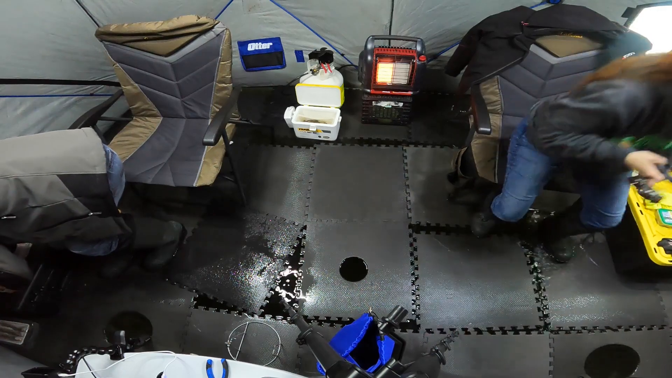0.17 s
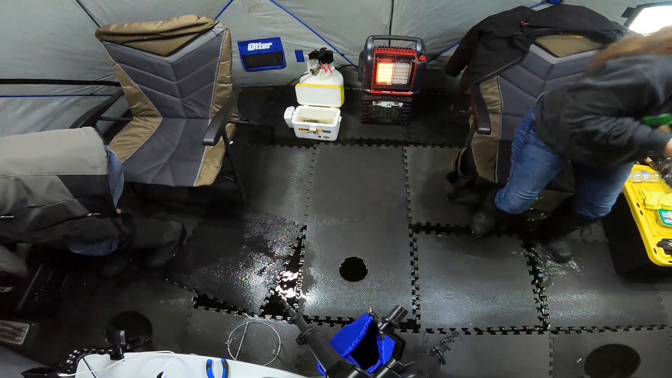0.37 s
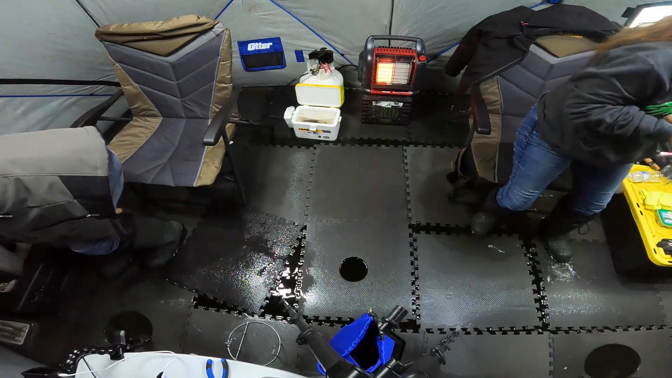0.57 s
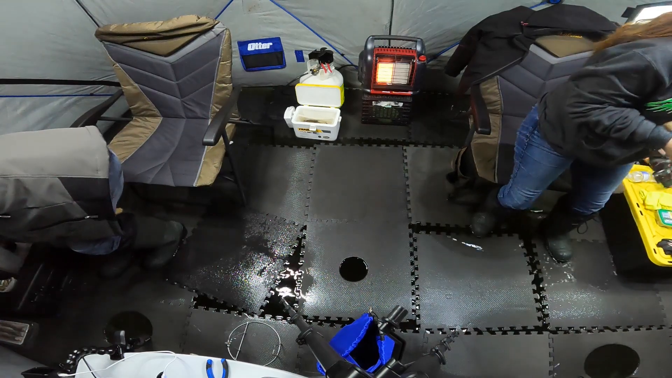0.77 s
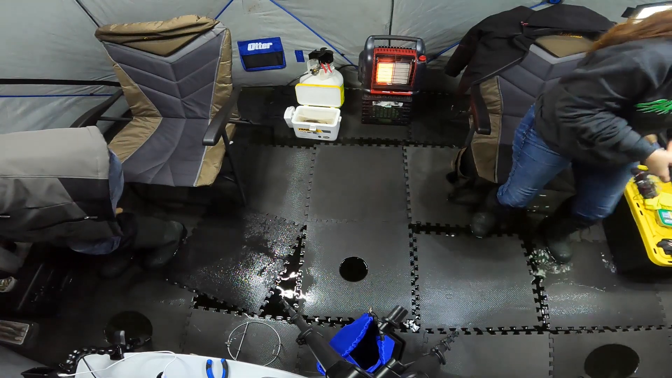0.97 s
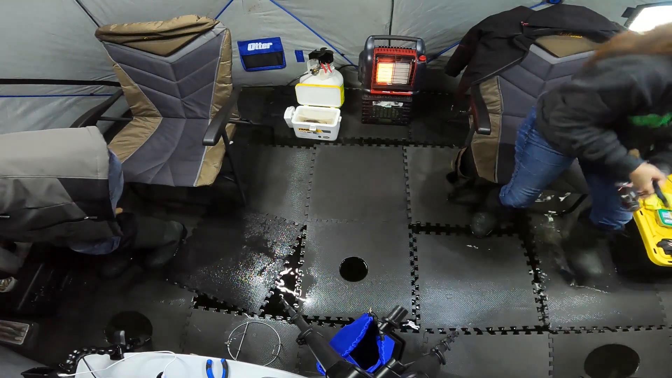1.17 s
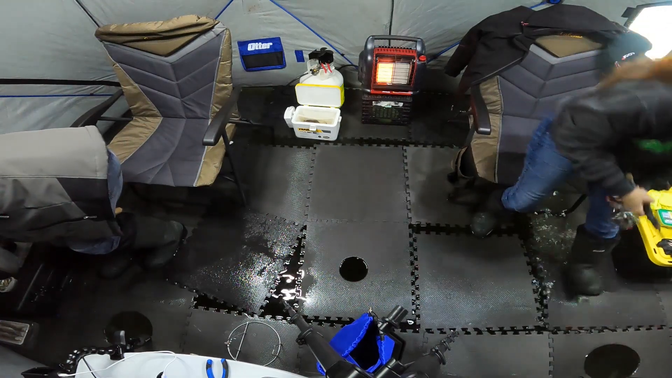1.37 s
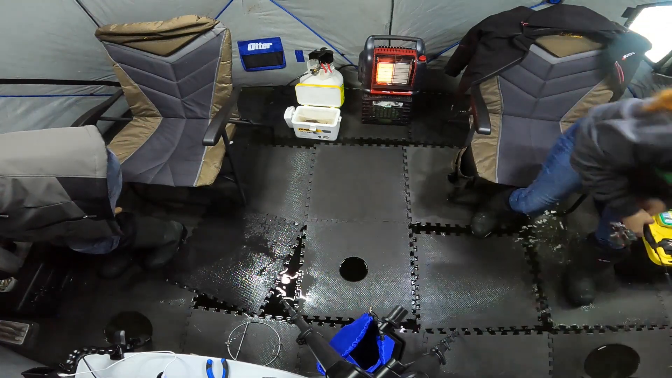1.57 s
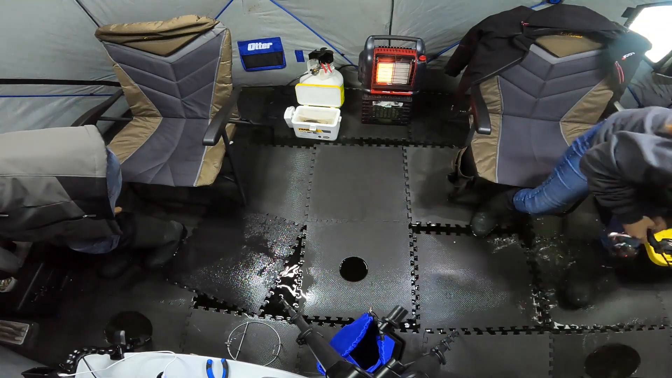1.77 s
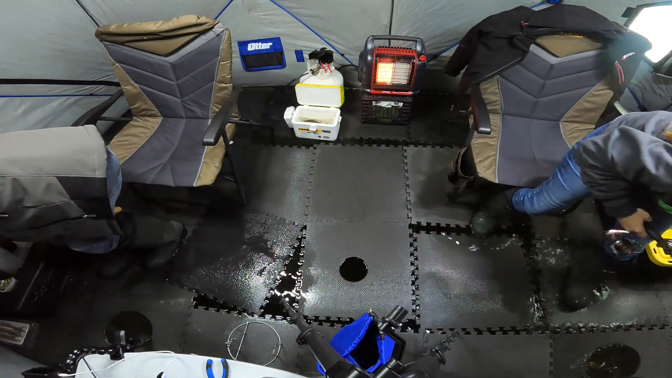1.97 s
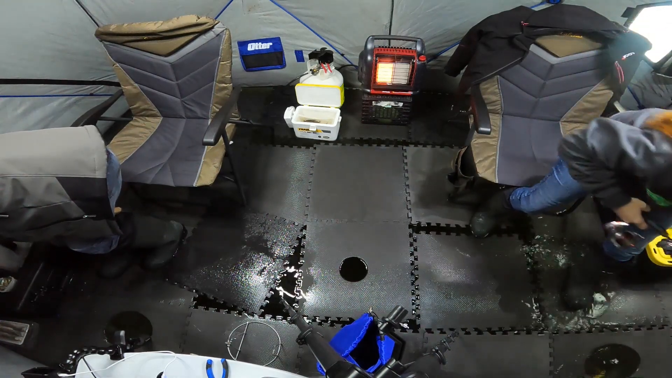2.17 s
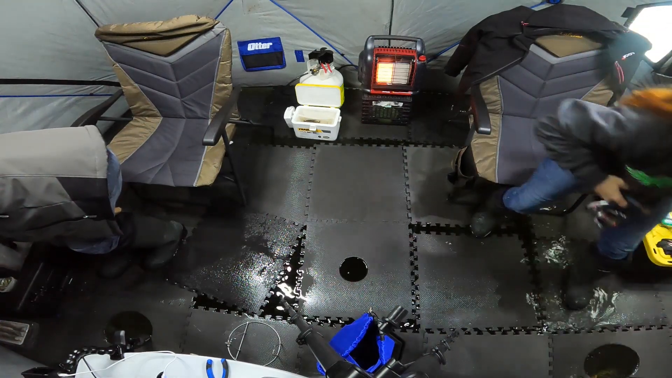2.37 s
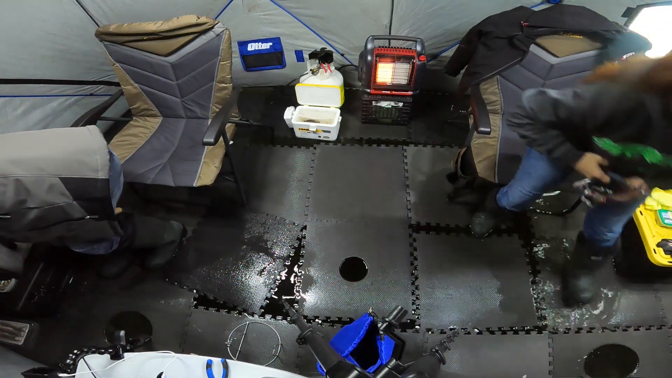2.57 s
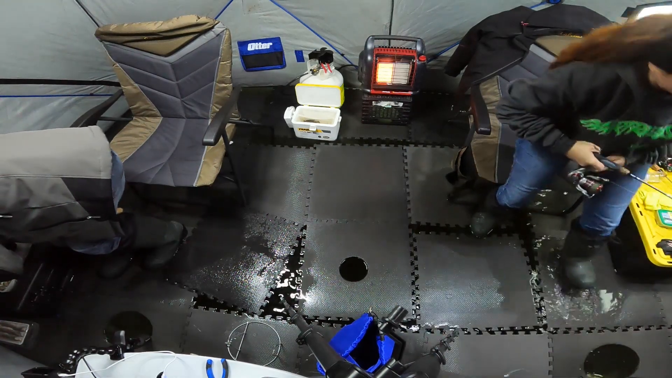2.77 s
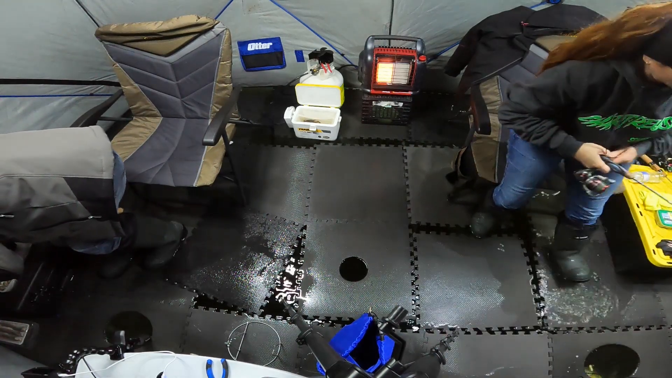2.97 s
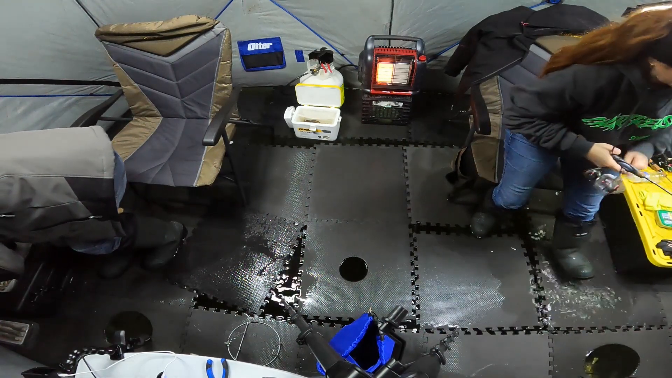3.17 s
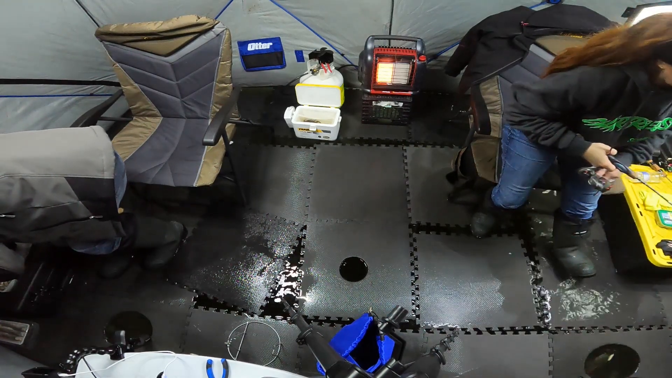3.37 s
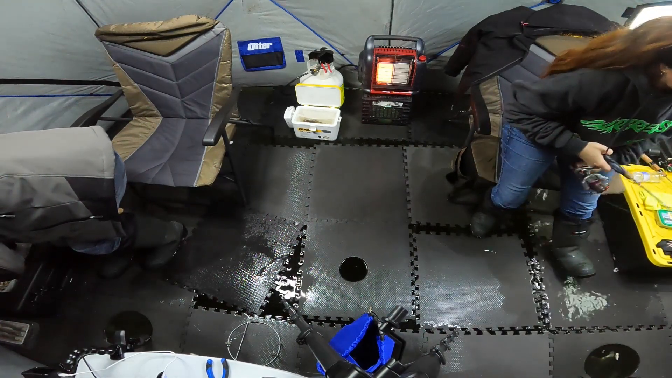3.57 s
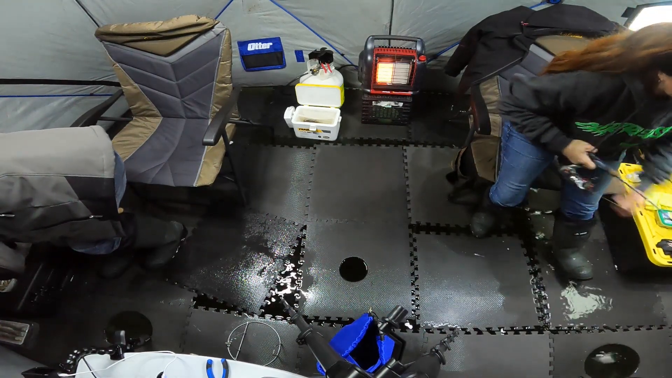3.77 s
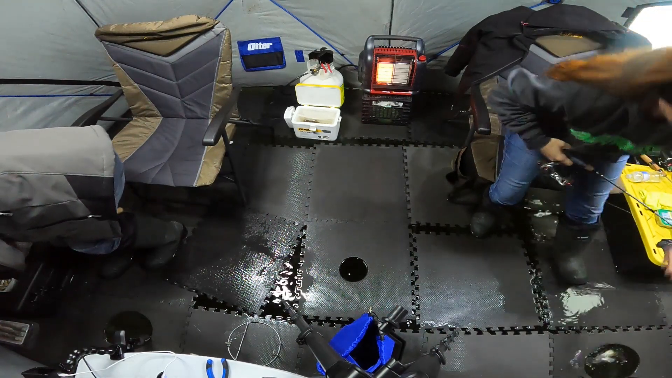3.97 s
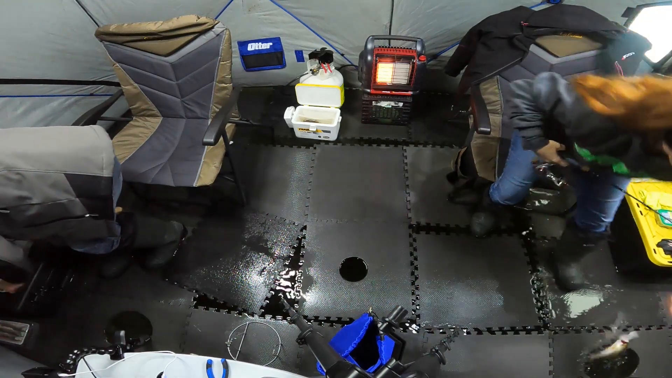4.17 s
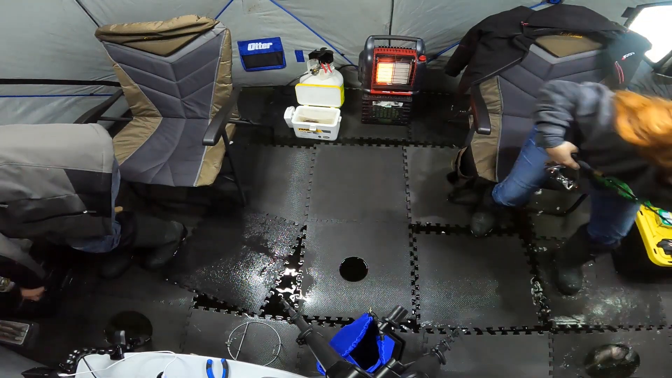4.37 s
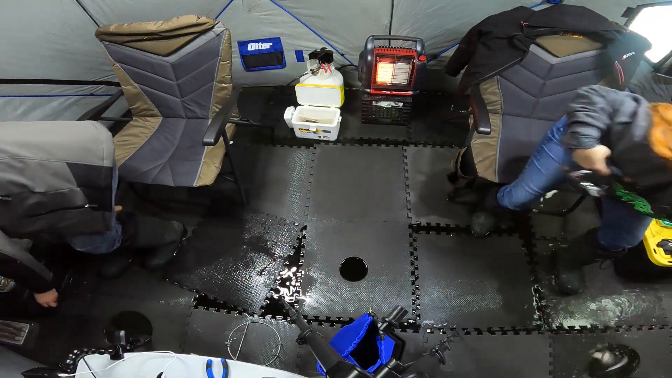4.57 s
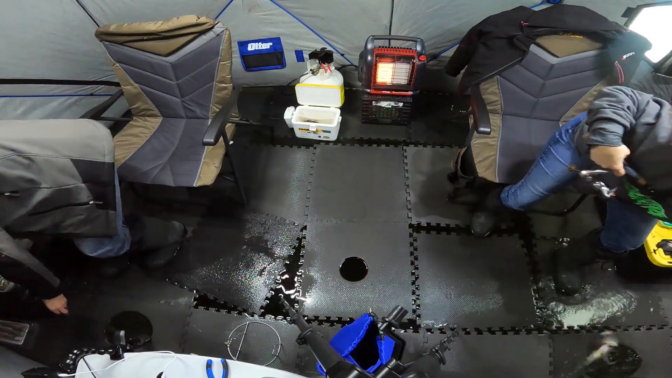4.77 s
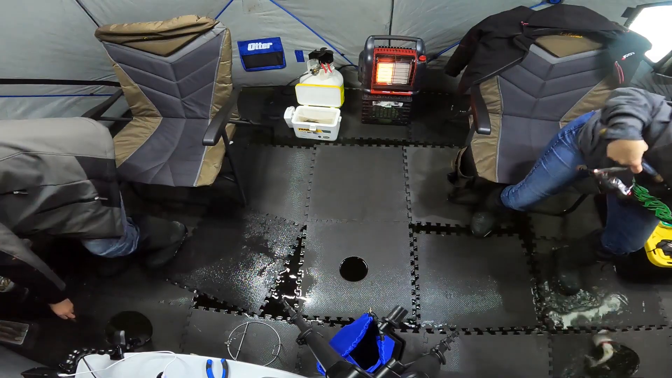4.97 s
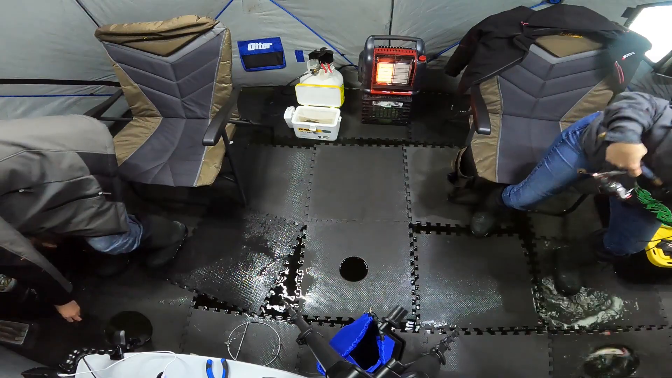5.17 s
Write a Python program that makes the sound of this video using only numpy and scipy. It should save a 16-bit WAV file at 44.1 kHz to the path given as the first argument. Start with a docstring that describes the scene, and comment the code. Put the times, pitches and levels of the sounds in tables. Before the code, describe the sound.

A close, wide stereo scene in a small fabric tent with short, soft reflections. A faint heater hiss, wavering low hum and jacket rustle lie beneath everything, with a deep flutter fading over the first second. Small wet glugs and ticks open, a boot press comes at 0.2 s, and line whirs thinly through a reel from 0.3 to 1.7 s. A plastic lid snaps in a quick triple click at 0.73 s. From 1.2 to 2.2 s boots squelch on flooded mats, with fizz, ringing bubbles and sharp pops strongest around 1.3-2.0 s. Quieter drips follow, then a hollow, wet heel knock at 2.8 s. Two short reel pulls come at 3.3 and 3.6 s in near calm. From 3.9 s a fish thrashes: rapid surges and slaps at 4.3, 4.6 and 4.9-5.1 s, bright spray, plopping bubbles and churning water, loudest near the end.

```python
"""Boots squelch on flooded foam mats inside an ice-fishing tent: bursts of drops and small ringing bubbles.
Tackle ticks, line swishes through a resonant reel, a plastic lid snaps and a heel rings the wet floor.
Then a fish thrashes in an ice hole, its surges and slaps driving spray, bubbles and churned water.
Beneath lie filtered noise for a heater's faint hiss, a rustling jacket and a low, beating hum."""
import sys
import numpy as np
from scipy import signal
from scipy.fft import rfft, irfft
from scipy.io import wavfile

SR = 44100
rng = np.random.default_rng(int(sys.argv[2]) if len(sys.argv) > 2 else 0)


def put_to_file(sound):
    """Save the sound as 16-bit audio at rate SR, in the file named by the first command-line argument."""
    columns = np.atleast_2d(sound).T  # one column per channel
    safe = np.clip(columns, -1, 1)
    whole_steps = np.round(safe * 32767)
    wavfile.write(sys.argv[1], SR, whole_steps.astype(np.int16))


N = 229937
T = np.arange(N) / SR

# All levels are relative: layer gains, tent echoes and the stereo mix come on top.
# rustle of the jacket as the angler rises, bends and grows still: (time [s], level [dB])
RUSTLE_LEVEL = [(0, -42.5), (.17, -49), (.3, -49.5), (1.08, -49.5), (1.3, -42.5), (2.2, -49), (2.52, -53.5),
                (2.95, -48), (3.13, -53.5), (3.23, -50), (3.28, -53), (3.38, -43), (3.52, -55), (3.85, -60)]
# lines of the low hum: (frequency [Hz], mean level [dB])
HUM_LINES = [(21, -57), (39.5, -56.5), (61, -67.5)]
# pulls of fishing line through the reel: (time [s], length [s], level [dB])
LINE_PULLS = [(0.308, 0.42, -48), (0.422, 0.21, -43), (0.688, 0.37, -41.5), (1.073, 0.65, -44.5),
              (3.264, 0.17, -43), (3.601, .215, -44)]
# what the running line rings in reel and rod: (frequency [Hz], width [Hz], gain [dB])
REEL_MODES = [(1754, 15, 5.5), (1994, 30, 4), (2286, 63, 6), (2970, 270, -0.5), (4700, 260, 5.5),
              (5080, 130, 3), (5580, 590, 1.5), (6870, 330, 9), (8000, 320, -7)]
# ticks and pops of tackle, wet boots and falling drops: (time [s], level [dB], centre [Hz])
TICKS = [(0.1642, -23.5, 7600), (0.2457, -28.5, 2680), (1.305, -17.5, 7470), (1.3526, -16.5, 6240),
         (1.4132, -18, 4030), (1.5785, -22, 2520), (1.7115, -16.5, 4250), (1.7558, -16, 2500),
         (1.874, -26, 2280), (1.882, -25, 3100), (1.9015, -16, 2320), (1.9695, -22, 1800),
         (2.036, -23.5, 4600), (2.113, -27, 3480), (2.173, -27.5, 3720), (2.197, -30, 1600),
         (2.213, -24.5, 7560), (2.254, -39.5, 1360), (2.348, -40.5, 960), (2.371, -37, 1600),
         (2.407, -33, 5200), (2.428, -28, 6200), (2.541, -43, 1740), (2.576, -36, 2140), (2.67, -27, 7200),
         (2.7272, -21, 2820), (2.758, -26, 4760), (2.774, -41, 840), (2.839, -35, 4480), (2.872, -27, 2080),
         (2.909, -30, 7400), (3.0266, -30, 6110), (3.167, -35, 2260), (3.1877, -23.5, 6860),
         (4.152, -26, 3370), (4.243, -20.5, 5300), (4.442, -22, 2310), (4.628, -25.5, 2040),
         (4.894, -15, 7590), (4.944, -21.5, 2170), (5.129, -21, 4730)]
# the box lid snaps shut and chatters: (time [s], level [dB], chatter relative to snap [dB])
LID_SNAPS = [(0.7296, -19, -38), (0.7365, -20, -19), (0.7426, -26, -9)]
# the heel lands and settles: (time [s], level [dB])
HEEL_KNOCKS = [(2.8062, -15), (2.8175, -29)]
# what the heel rings in the wet floor: (frequency [Hz], gain [dB], t60 [s])
FLOOR_MODES = [(113, -4.5, 0.24), (244, -5.5, 0.14), (375, -5, 0.094), (740, -1, 0.22), (810, 10.5, 0.036),
               (930, 12.5, 0.02), (2490, 10, 0.0059)]
# glugs of water pockets under the soles: (time [s], level [dB], start pitch [Hz], end pitch [Hz])
GLUGS = [(0, -37, 1120, 1720), (.086, -46, 317, 228), (.207, -44.5, 443, 336), (1.17, -35.5, 683, 290),
         (1.197, -41, 1260, 2030), (1.281, -40, 490, 1510), (1.348, -36.5, 1093, 2080)]
# largest bubbles, under boots and in the hole: (time [s], level [dB], starting pitch [Hz], t60 [s])
BIG_BUBBLES = [(0.235, -38.5, 400, 0.028), (1.358, -27.5, 1850, 0.027), (1.373, -31, 1800, 0.037),
               (1.39, -40.5, 1350, 0.051), (1.47, -29.5, 2160, 0.017), (1.592, -27, 1475, 0.015),
               (1.605, -30, 1420, 0.024), (1.617, -34, 754, 0.024), (1.666, -33, 467, 0.052),
               (1.761, -30, 2670, 0.03), (1.881, -23.5, 1120, 0.0067), (1.954, -23.5, 1910, .02),
               (1.988, -29, 705, 0.047), (2.027, -29, 491, 0.035), (2.09, -33, 455, 0.059),
               (2.121, -29.5, 2640, 0.019), (2.174, -32, 3610, 0.047), (2.908, -32.5, 830, 0.024),
               (3.005, -34.5, 1590, 0.015), (3.008, -30, 2270, 0.011), (3.942, -30.5, 820, 0.011),
               (4.01, -26, 8700, 0.033), (4.019, -38.5, 457, 0.047), (4.155, -29.5, 3170, 0.039),
               (4.167, -32.5, 990, 0.015), (4.482, -32, 714, 0.17), (4.559, -30, 2630, .04),
               (4.565, -33.5, 1117, 0.054), (4.658, -28, 694, 0.0099), (4.729, -30.5, 860, 0.019),
               (4.735, -28.5, 1810, 0.035), (4.778, -32, 725, 0.0076), (4.785, -32.5, 420, 0.028),
               (4.97, -29, 1232, 0.053), (4.987, -17.5, 1980, 0.015), (5.086, -36, 866, 0.026)]
# each press of a boot on the flooded mats:
# (time [s], hold [s], wet fizz [dB], squelch [dB], rumble [dB])
BOOT_PRESSES = [(0, 0.1, -62, -48.5, -70), (.208, 0.027, -86, -52.5, -53), (1.17, 0.045, -55, -43, -51),
                (1.3, 0.18, -51, -76, -89), (1.485, 0.11, -55, -62, -49.5),
                (1.585, 0.12, -50.5, -43.5, -48.5), (1.708, 0.056, -46.5, -36, -47),
                (1.873, 0.042, -53, -42, -66), (1.903, 0.036, -45.5, -45, -51.5),
                (1.975, 0.09, -56, -47, -52), (2.08, 0.092, -63, -50.5, -79),
                (2.192, 0.011, -51, -45, -51.5), (2.37, 0.051, -60.5, -53, -77),
                (2.665, 0.19, -69.5, -52.5, -63.5), (2.803, 0.01, -53.5, -35, -42),
                (2.865, 0.12, -58, -51, -80), (2.982, 0.052, -60.5, -47, -68),
                (3.06, 0.13, -94, -69, -56.5)]
# surges thrown up by beats of the fish's body:
# (time [s], hold [s], fine mist [dB], splatter [dB], churned water [dB])
FISH_SURGES = [(3.895, .05, -47.5, -53, -55), (3.941, 0.063, -39.5, -46.5, -42),
               (4.045, 0.013, -42, -51, -46), (4.1, 0.061, -42, -50.5, -63),
               (4.148, 0.027, -43.5, -44, -46), (4.203, .2, -34, -42.5, -48),
               (4.295, 0.041, -51, -41.5, -42), (4.395, .13, -33, -40, -48.5),
               (4.47, 0.052, -54, -53, -40.5), (4.585, 0.054, -32.5, -39, -41),
               (4.624, 0.089, -28, -38, -41), (4.742, 0.012, -44, -38, -41.5),
               (4.81, 0.09, -36, -44.5, -48), (4.879, 0.091, -26, -42, -41),
               (4.943, 0.053, -27, -38.5, -43.5), (5.015, 0.084, -38.5, -40.5, -44),
               (5.128, 0.014, -28, -36.5, -43)]
# tail slaps on the water: (time [s], fine mist [dB], splatter [dB], t60 [s])
TAIL_SLAPS = [(3.945, -51, -45, 0.11), (4.04, -38, -35.5, 0.055), (4.3, -26, -35.5, 0.076),
              (4.6278, -19.5, -30, 0.033), (4.881, -32, -37, 0.067), (4.944, -23, -37, 0.066),
              (4.972, -25, -56, 0.05), (5.0177, -30, -33, 0.12), (5.125, -26.5, -51, .14)]
# Spectral outlines, each: (frequency [Hz], gain [dB])
# the heater's hiss
HEATER_SPECTRUM = [(25, -12), (60, -8), (110, 0), (200, -4.5), (520, -2), (1100, -14.5), (1800, -15.5),
                   (3200, -26), (8400, -18.5), (11000, -22), (13800, -28), (16000, -29)]
# rubbing jacket fabric
JACKET_SPECTRUM = [(200, -17.5), (500, -7.5), (1100, -12), (2100, -5.5), (3300, -10), (4600, -9.5),
                   (8000, -4), (9200, -8), (11200, -20.5), (13800, -10.5), (16000, -25)]
# the plastic box lid
LID_SPECTRUM = [(180, -49), (300, -23), (599, -16.5), (780, -7.5), (1400, -19), (1790, -4.5), (2350, -6),
                (2630, -15), (3200, -12.5), (4400, -14), (7130, -21.5), (10500, -34), (14000, -34)]
# the dull foam mats
MAT_SPECTRUM = [(40, -34), (80, -1), (140, 3), (190, -8), (300, -15.5), (450, -12.5), (900, -39)]
# fine fizz of water pressed from the foam
FIZZ_SPECTRUM = [(1000, -40), (2500, -18), (3380, -17.5), (4140, -24), (4880, -12.5), (8940, -12.5),
                 (11500, -21.5), (14500, -17), (16000, -40)]
# coarse squelch under the soles
SQUELCH_SPECTRUM = [(150, -59), (250, -35), (479, 2), (1040, -4.5), (1800, 5), (2630, -1), (3100, -10),
                    (4000, -5), (5200, -73), (8800, -120)]
# fine mist
MIST_SPECTRUM = [(2500, -43), (5000, -8.5), (7130, -8.5), (8140, 1.5), (11400, -8), (14100, 0), (15400, -5),
                 (16200, -39)]
# coarser drops
SPLATTER_SPECTRUM = [(1200, -16), (2400, -5.5), (3300, -8), (4580, -1.5), (5300, -3), (7000, -1),
                     (9000, -8), (14000, -30)]
# churned water
CHURN_SPECTRUM = [(150, -30), (250, -28), (611, -14), (694, 2), (780, 3), (1130, -28), (1400, 0.5),
                  (2040, -1), (4000, -13), (5200, -54), (8800, -120)]
# colour of the side signal, strongest in the top octave
SIDE_SPECTRUM = [(40, -12), (250, -12), (2000, -17), (4500, -11.5), (6500, -8), (8000, -4.5), (9500, 4.5),
                 (15000, 4)]

PULL_RAMP_S = .05  # the line speeds up and slows down over this time
TICK_T60_S, TICK_RISE_CYCLES = .02, 1.7
GLUG_S = 0.0146  # length of each glug
BUBBLE_RISE = 0.155  # mean share by which a large bubble's pitch climbs within its t60
PRESS_ATTACK_S, FIZZ_T60_S, SQUELCH_T60_S = .007, .3, .24
MAT_ATTACK_S, MAT_T60_S = 0.0031, 0.064  # how the foam gives and recovers
SURGE_ATTACK_S, SPRAY_T60_S, CHURN_T60_S = .005, .38, .3
SLOSH_DB = -20  # rumble of the mats, relative to the splatter envelope
TENT_TAIL_DB, TENT_T60_S = -3.5, .15
TOP_HZ = 16000


def undb(db):
    """Decibels to gain."""
    return 10 ** (np.asarray(db) / 20)


def unit(x):
    """Scale to rms 1."""
    return x / np.sqrt(np.mean(x ** 2))


def fade(t, t60):
    """A free decay that loses 60 dB in t60, at least a millisecond."""
    return np.exp(-np.log(1000) * t / max(t60, 1e-3))


def add(out, s, sound):
    """Mix a sound in at time s."""
    i = max(int(s * SR), 0)
    out[i:i + len(sound)] += sound[:max(N - i, 0)]


def colour(x, points, size=2048):
    """Causal minimum-phase filter with the given spectral outline."""
    hz, db = np.transpose(points)
    bins = np.maximum(np.fft.rfftfreq(size, 1 / SR), 1)
    outline = undb(np.interp(np.log(bins), np.log(hz), db))
    # folding the cepstrum onto positive time makes the filter causal
    cepstrum = irfft(np.log(outline))
    cepstrum[1:size // 2] *= 2
    cepstrum[size // 2 + 1:] = 0
    response = irfft(np.exp(rfft(cepstrum)))
    return signal.fftconvolve(x, response)[:len(x)]


def walk(rate):
    """Random drift around zero, spread near 1, with rate new targets a second."""
    return np.interp(T * rate, np.arange(N), rng.standard_normal(N))


def swells(rows, column, attack_s, t60):
    """Gain from one dB column of events that rise, hold and die away; overlaps add in power."""
    power, t = np.zeros(N), T[:SR]
    for row in rows:
        start, hold = row[:2]
        attack = np.minimum(t / max(attack_s, 1e-3), 1)
        shape = attack * fade(np.maximum(t - hold, 0), t60)
        add(power, start, (undb(row[column]) * shape) ** 2)
    return np.sqrt(power)


def patter(rate, spread_db):
    """Random tiny impacts, rate a second: many weak ones, a few strong."""
    hit = rng.random(N) < rate / SR
    size = undb(spread_db * np.minimum(rng.exponential(size=N), 4))
    return unit(hit * size * rng.choice([-1, 1], N))


def bubble(hz, t60, rise):
    """An air pocket swells into ringing within a cycle and climbs in pitch as it nears the surface."""
    life = max(t60, .002)
    t = T[:int(life * SR)]
    turns = hz * (t + rise * t ** 2 / (2 * life))
    onset = 1 - np.exp(-2 * hz * t)
    return np.sin(2 * np.pi * turns) * fade(t, t60) * onset


def froth(low_hz, high_hz, cycles, spread_db, count):
    """A steady swarm of small bubbles of mixed pitch, strength and ringing time."""
    out = np.zeros(N)
    for when, pitch, size, life in rng.random((count, 4)):
        hz = low_hz * (high_hz / low_hz) ** pitch
        gain = undb(spread_db * size) * np.sqrt(hz)
        add(out, when * N / SR, gain * bubble(hz, cycles * (.5 + life) / hz, rise=0.21))
    return unit(out)


def crack(points, t60, tail_db, tail_t60):
    """A hard contact with a weaker, longer rattle under it, peak 1."""
    t = T[:SR // 3]
    envelope = fade(t, t60) + undb(tail_db) * fade(t, tail_t60)
    sound = colour(rng.standard_normal(len(t)) * envelope, points)
    return sound / np.abs(sound).max()


def background():
    """Steady heater hiss, jacket fabric rubbing in tiny impacts, and a wavering hum whose lines beat."""
    hiss = undb(-59.0) * unit(colour(rng.standard_normal(N), HEATER_SPECTRUM))
    fabric = unit(colour(patter(rate=8000, spread_db=2.0), JACKET_SPECTRUM))
    rustle = fabric * undb(np.interp(T, *np.transpose(RUSTLE_LEVEL)) + 2.4 * walk(35))
    hum = np.zeros(N)
    for hz, db in HUM_LINES:
        line = unit(np.sin(2 * np.pi * hz * T + 1.4 * walk(6.5)))
        hum += line * undb(db + 2.4 * walk(11))
    # a deep flutter dies away as the angler rises from the chair
    deep = [(24, -2.5), (42, -16), (70, -21), (300, -62)]
    flutter = unit(colour(rng.standard_normal(N), deep)) * fade(T, 1.17)
    return hiss + rustle + hum + undb(-36.0) * flutter


def tent(x, wall_db, tail_db, t60, count=4):
    """Near fabric walls echo, with a short tail; sound darts between places with their own paths."""
    t = T[:SR // 3]
    shares = np.array([walk(60) for _ in range(count)])
    shares /= np.linalg.norm(shares, axis=0)
    out = np.zeros(N)
    for share in shares:
        tail = unit(rng.standard_normal(len(t)) * fade(t, t60) * (t > .003))
        path = undb(tail_db) * tail / np.sqrt(len(t))
        walls = (rng.uniform(.005, .013, size=2) * SR).astype(int)
        path[walls] += undb(wall_db)
        out += signal.fftconvolve(x * share, path)[:N]
    return out


def reel():
    """Each pull drags the line through the reel, whose body rings with the friction."""
    speed = np.zeros(N)
    for s, length, db in LINE_PULLS:
        ramp = np.minimum(T - s, s + length - T) / PULL_RAMP_S
        speed += undb(db) * np.clip(ramp, 0, 1)
    friction = patter(rate=6000, spread_db=3.5)
    body = np.zeros(N)
    for hz, width, db in REEL_MODES:
        body += undb(db) * signal.lfilter(*signal.iirpeak(hz, hz / width, fs=SR), friction)
    return undb(-3) * speed * unit(body) * undb(1.2 * walk(45))


def ticks():
    """Tackle, boots and drops: a noisy contact plus a pop that swells and dies within a few cycles."""
    out, t = np.zeros(N), T[:SR // 3]
    for s, db, hz in TICKS:
        body = [(hz / 4, -34), (hz / 1.5, -6), (hz, 0), (hz * 1.2, -5), (hz * 3, -20)]
        contact = crack(body, t60=.007, tail_db=-17, tail_t60=TICK_T60_S)
        age = hz * t / TICK_RISE_CYCLES
        pop = np.sin(2 * np.pi * hz * t) * (age * np.exp(1 - age)) ** 2
        add(out, s, undb(db) * (undb(-4) * contact + undb(-2) * pop))
    return out


def lid():
    """The plastic lid snaps in hard contacts, each with its own chatter."""
    out = np.zeros(N)
    for s, db, chatter_db in LID_SNAPS:
        snap = crack(LID_SPECTRUM, t60=0.0059, tail_db=chatter_db, tail_t60=0.082)
        add(out, s, undb(db + 5.0) * snap)
    return out


def heel():
    """The heel rings the modes of the wet floor and squirts water."""
    out, t = np.zeros(N), T[:SR // 3]
    ring = np.zeros(len(t))
    for hz, db, t60 in FLOOR_MODES:
        ring += undb(db) * np.sin(2 * np.pi * hz * t) * fade(t, t60)
    ring /= np.abs(ring).max()
    for s, db in HEEL_KNOCKS:
        squirt = crack(SPLATTER_SPECTRUM, t60=0.016, tail_db=-18, tail_t60=.1)
        add(out, s, undb(db) * (ring + undb(-11) * squirt))
    return out


def glugs():
    """A cavity under a sole rings while it changes size, so its pitch sweeps."""
    out, t = np.zeros(N), T[:int(GLUG_S * SR)]
    for s, db, start_hz, end_hz in GLUGS:
        turns = np.cumsum(np.linspace(start_hz, end_hz, len(t))) / SR
        add(out, s, undb(db) * np.sin(2 * np.pi * turns) * np.sin(np.pi * t / GLUG_S))
    return out


def plops():
    """Large bubbles, each rung by a ragged collapse and joined by three weaker, briefer ones."""
    out = np.zeros(N)
    for s, db, hz, t60 in BIG_BUBBLES:
        collapse = .05 * rng.standard_normal(SR // 40) * fade(T[:SR // 40], .02)
        collapse[0] = 1
        ring = signal.fftconvolve(bubble(hz, t60, rise=BUBBLE_RISE * 2 * rng.random()), collapse)
        add(out, s, undb(db) * ring / np.abs(ring).max())
        for late, pitch in rng.random((3, 2)):
            companion = bubble(hz * 2 ** (1.4 * pitch - .5), t60 / 2, rise=0.12)
            add(out, s + .028 * late, undb(db - 4.5) * companion)
    return out


def boots():
    """Soles press water out of foam: fizz, bursting beads, coarse squelch and a dull mat rumble."""
    fizz = unit(colour(patter(rate=2200, spread_db=2), FIZZ_SPECTRUM)) * undb(2.5 * walk(60))
    squelch = unit(colour(patter(rate=350, spread_db=2), SQUELCH_SPECTRUM)) * undb(3 * walk(50))
    air = froth(low_hz=650, high_hz=4350, cycles=16, spread_db=18, count=600)
    beads = froth(low_hz=3500, high_hz=9000, cycles=26, spread_db=20, count=1100)
    rumble = unit(colour(patter(rate=500, spread_db=2), MAT_SPECTRUM))
    seep = swells(BOOT_PRESSES, column=2, attack_s=PRESS_ATTACK_S, t60=FIZZ_T60_S)
    gush = swells(BOOT_PRESSES, column=3, attack_s=PRESS_ATTACK_S, t60=SQUELCH_T60_S)
    weight = swells(BOOT_PRESSES, column=4, attack_s=MAT_ATTACK_S, t60=MAT_T60_S)
    wet = seep * undb(7.5) * (fizz + beads)
    wet += gush * (undb(-3.5) * squelch + undb(-5.0) * air)
    return wet + weight * rumble


def fish():
    """Surges and slaps throw mist and coarser drops; the body churns in air and shakes the mats."""
    fine = swells(FISH_SURGES, column=2, attack_s=SURGE_ATTACK_S, t60=SPRAY_T60_S)
    coarse = swells(FISH_SURGES, column=3, attack_s=SURGE_ATTACK_S, t60=SPRAY_T60_S)
    for s, mist_db, splatter_db, t60 in TAIL_SLAPS:
        slap = fade(T[:SR // 2], t60)
        add(fine, s, undb(mist_db) * slap)
        add(coarse, s, undb(splatter_db) * slap)
    rumble = undb(SLOSH_DB) * coarse * unit(colour(patter(rate=620, spread_db=2.5), MAT_SPECTRUM))

    mist = unit(colour(patter(rate=7600, spread_db=0.5), MIST_SPECTRUM))
    beads = froth(low_hz=6800, high_hz=15200, cycles=37, spread_db=14, count=2500)
    beads = unit(colour(beads, MIST_SPECTRUM))
    splatter = unit(colour(patter(rate=1500, spread_db=2.2), SPLATTER_SPECTRUM))
    drops = froth(low_hz=1700, high_hz=8000, cycles=28, spread_db=20, count=1500)
    drops = unit(colour(drops, SPLATTER_SPECTRUM))
    spray = fine * undb(2 * walk(130)) * (undb(-3.0) * mist + undb(-8.0) * beads)
    spray += coarse * undb(2 * walk(70)) * unit(splatter + drops)

    water = unit(colour(patter(rate=500, spread_db=1), CHURN_SPECTRUM))
    air = froth(low_hz=900, high_hz=3200, cycles=26, spread_db=16, count=700)
    gurgle = froth(low_hz=330, high_hz=1000, cycles=16, spread_db=12, count=350)
    churn = swells(FISH_SURGES, column=4, attack_s=SURGE_ATTACK_S, t60=CHURN_T60_S)
    churned = churn * (undb(-5.5) * water + undb(-4) * air + undb(-16) * gurgle)
    return spray + churned + rumble


def scene():
    """Everything sounds in the tent; scattered drops reach the two ports differently, mostly in the treble."""
    hits = plops() + glugs() + ticks() + lid() + heel()
    # fresh random drops for mid and side, the same single hits in both
    ahead = fish() + boots() + reel() + hits
    across = fish() + boots() + reel() + hits
    mid = undb(-0.47) * (ahead + tent(ahead, wall_db=-10.5, tail_db=TENT_TAIL_DB, t60=TENT_T60_S))
    side = undb(-3) * (across + tent(across, wall_db=-8.0, tail_db=TENT_TAIL_DB, t60=TENT_T60_S))
    mid = mid + background()
    side = colour(side + background(), SIDE_SPECTRUM)
    return np.array([mid + side, mid - side])


def record(dry):
    """A steep elliptic low-pass cuts the top."""
    return signal.sosfilt(signal.ellip(10, .2, 75, TOP_HZ, fs=SR, output="sos"), dry)


dry = scene()
out = record(dry)
put_to_file(out)
```